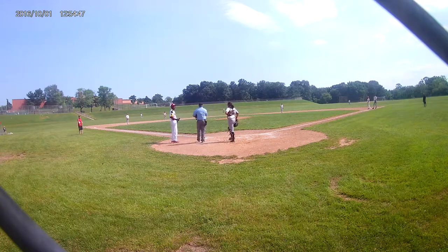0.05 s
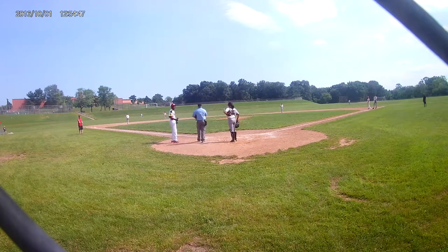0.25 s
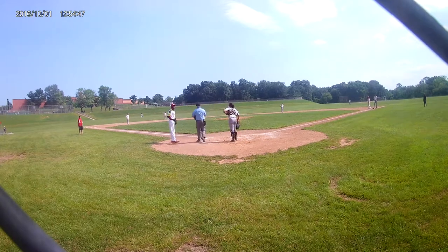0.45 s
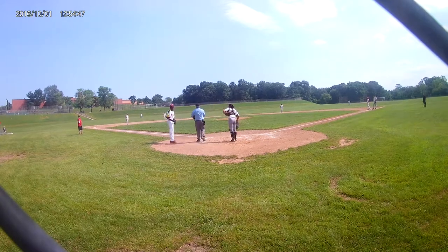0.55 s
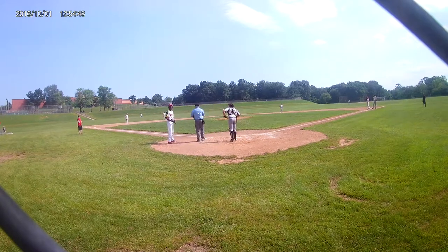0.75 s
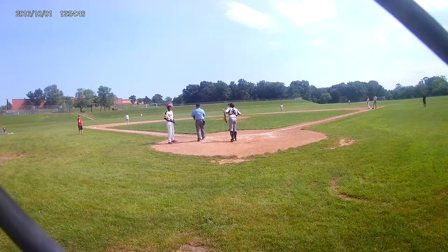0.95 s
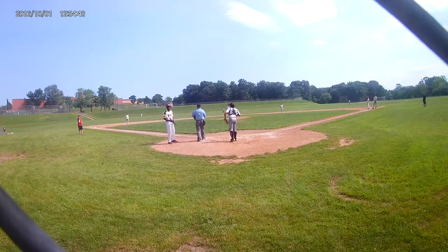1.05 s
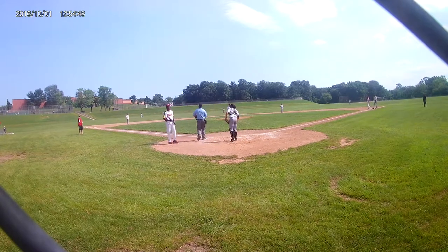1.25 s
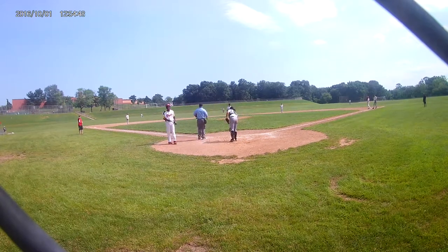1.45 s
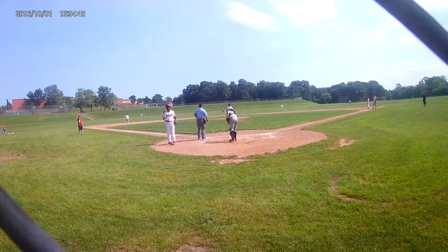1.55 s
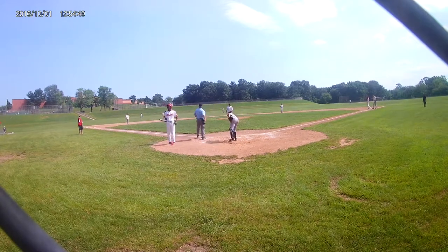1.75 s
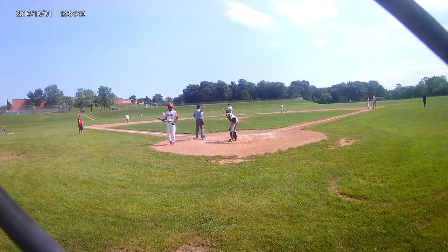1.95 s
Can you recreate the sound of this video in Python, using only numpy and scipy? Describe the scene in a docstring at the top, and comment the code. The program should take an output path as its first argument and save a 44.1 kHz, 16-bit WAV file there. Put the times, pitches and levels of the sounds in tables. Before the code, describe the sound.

Loud overloaded crash of a ball on a metal fence, followed by jangling, booming and ticking links

```python
"""Beside a field, a ball slams into a chain-link fence that carries a small camera.
The blow rings the wires, thuds and crashes, and overloads the microphone. The mesh keeps shaking: thousands of
random wire knocks, filtered into low, middle and high parts, with hiss as sizzle on top. The frame booms in
uneven swells of low filtered noise, loose links tick as short noise bursts, and a faint rumble lies underneath."""
import sys
import numpy as np
from scipy import signal
from scipy.fft import rfft, irfft, next_fast_len
from scipy.io import wavfile
from scipy.ndimage import uniform_filter1d, map_coordinates

SR = 44100
rng = np.random.default_rng(int(sys.argv[2]) if len(sys.argv) > 2 else 0)


def unload_audio(sound):
    """Save the sound as a 16-bit wav file, at the path given as the first command line argument."""
    columns = np.transpose(np.atleast_2d(sound))
    # keep every value between -1 and 1, then stretch to whole-number steps
    steps = np.round(np.clip(columns, -1, 1) * 32767)
    wavfile.write(sys.argv[1], SR, steps.astype(np.int16))


N = 88200
T = np.arange(N) / SR  # time of every sample, s
HIT_S, RISE_S = 0.2155, 0.0105  # first touch; time the ball takes to load the mesh


def amp(db):
    """Turn decibels into a plain multiplier."""
    return 10 ** (np.asarray(db) / 20)


def unit(x):
    """Scale a signal to an average (rms) level of 1."""
    return x / np.sqrt(np.mean(x ** 2) + 1e-20)


def curve(rows):
    """Join (start_s, level_db) points with straight lines, one value per sample."""
    return np.interp(T, *np.transpose(rows))


def coloured(x, points):
    """Filter x to the given (pitch_hz, level_db) shape without sounding early, then bring it to rms 1."""
    size = 8192
    hz, db = np.transpose(points)
    bins_hz = np.fft.rfftfreq(size, 1 / SR)
    gain_db = np.interp(np.log(bins_hz + 1), np.log(hz + 1), db, -90, -90)
    # Folding the cepstrum makes the filter minimum phase: it only answers after its input.
    cepstrum = irfft(np.log(amp(gain_db)), size)
    cepstrum[1:size // 2] *= 2
    cepstrum[size // 2 + 1:] = 0
    response = irfft(np.exp(rfft(cepstrum)), size)
    return unit(signal.fftconvolve(x, response)[:N])


def ring(hz, t60, t, attack_s=0.0002):
    """A sine that starts at t = 0 and dies away by 60 dB in t60 seconds."""
    t = np.maximum(t, 0)
    attack = 1 - np.exp(-t / attack_s)
    return attack * amp(-60 * t / t60) * np.sin(2 * np.pi * hz * t)


def onset():
    """Silence, then a swift rise while the ball loads the mesh."""
    return np.clip((T - HIT_S) / RISE_S, 0, 1) ** 3.5


# Tone of the field rumble: pitch_hz, level_db (per Hz, relative)
FIELD_TONE = [(15, -46), (25, -15), (81, 10.5), (450, -3.5), (4500, -19.5), (7890, -23.5), (9770, -22.5),
              (15000, -22.5)]
FIELD_DB = -62


def field():
    """Faint outdoor rumble: steady noise, strongest at low pitches."""
    return amp(FIELD_DB) * coloured(rng.standard_normal(N), FIELD_TONE)


# Swells of the frame's boom: start_s, level_db
BOOM_SWELLS = [(0.232, -46), (0.25, -17), (0.296, -21.5), (0.324, -34), (0.36, -19), (0.438, -29),
               (0.458, -15), (0.506, -27), (0.552, -14.5), (0.586, -23.5), (0.654, -16), (0.734, -33),
               (0.754, -22), (0.836, -28.5), (0.872, -36), (0.98, -22.5), (1.112, -36), (1.138, -28),
               (1.186, -37), (1.216, -29.5), (1.432, -35.5), (1.472, -30.5), (1.798, -42), (1.816, -28.5),
               (1.88, -39.5), (2.0, -40.5)]
# Tone of the boom: pitch_hz, level_db (per Hz, relative)
FRAME_TONE = [(15, -78), (25, -16.5), (43, -11), (60, -6), (75, 7.5), (92, -0.5), (130, -8.5), (170, -38),
              (290, -120)]


def frame():
    """The frame booms: low noise, its own ups and downs partly evened out, follows the swells."""
    wave = signal.hilbert(coloured(rng.standard_normal(N), FRAME_TONE))
    loudness = np.abs(wave)
    steady = wave.real / (loudness + 0.3) ** 0.75
    return onset() * amp(curve(BOOM_SWELLS)) * unit(steady)


# How strongly the mesh shakes: start_s, level_db
SHAKE = [(.226, -8), (.25, -3), (.3, -9.5), (.36, -12), (.43, -16.5), (.5, -20), (.58, -21.5), (.66, -23.5),
         (.73, -26.5), (.85, -28), (1.0, -31), (1.2, -34.5), (1.45, -38), (1.7, -39), (2.0, -43)]


def shaking_db():
    """The shaking of the mesh over time, which the knocks and faint ticks follow."""
    return curve(SHAKE)


# Clear ticks of loose links: start_s, level_db (at the start of the tick)
TICKS = [(0.3657, -37), (0.454, -51), (0.4788, -46), (0.52, -41), (0.5488, -39), (0.6162, -58),
         (0.6432, -41), (0.6702, -38), (0.7813, -49), (0.8067, -48), (0.8352, -55), (0.8706, -58),
         (0.896, -44), (0.927, -59), (0.9529, -60), (0.9814, -47), (1.0243, -53), (1.0365, -47),
         (1.1395, -57), (1.1699, -48), (1.2228, -57), (1.2773, -49), (1.3063, -55), (1.3286, -57),
         (1.4707, -63), (1.6344, -61), (1.8658, -70), (1.8954, -62)]
# Tone of a tick: pitch_hz, level_db (per Hz, relative)
LINK_TONE = [(2800, -39), (3500, -10), (4600, -1), (5500, -6), (6300, -16.5), (7500, -31)]
TICK_T60 = 0.014  # s to fall by 60 dB
FAINT_TICKS_PER_S, FAINT_TICK_DB = 82, -32.5  # average number; level relative to the shaking


def links():
    """Loose links click dryly: short bursts of noise, some clear and many faint at random times."""
    faint_db = shaking_db() + FAINT_TICK_DB + rng.normal(0, 4, N)
    is_tick = rng.random(N) < FAINT_TICKS_PER_S / SR
    starts = is_tick * amp(faint_db) * onset()
    for start_s, level_db in TICKS:
        starts[round(start_s * SR)] = amp(level_db)
    decay = amp(-60 * T[:SR // 20] / TICK_T60)
    bursts = signal.fftconvolve(starts, decay)[:N]
    return bursts * coloured(rng.standard_normal(N), LINK_TONE)


KNOCKS_PER_S, KNOCK_SPREAD_DB = 6000, 3  # average number of contacts; how uneven they are
SURGES_PER_S, SURGE_DB = 60, 1  # random points per second of the surge curve; its strength
PATCHY_DB, JINGLE_PATCHY_DB = 1.5, 3  # how far pitches come and go


def knocks(per_s=KNOCKS_PER_S, patchy_db=PATCHY_DB):
    """Random wire contacts of uneven size that surge in level and shift in colour."""
    size = amp(KNOCK_SPREAD_DB * rng.standard_normal(N)) * rng.standard_normal(N)
    surge = map_coordinates(rng.standard_normal(400), [T * SURGES_PER_S])
    is_knock = rng.random(N) < per_s / SR
    hits = size * is_knock * amp(SURGE_DB * surge)
    # Raise and lower small patches of pitch and time at random.
    spectrum = signal.stft(hits, nperseg=1024)[2]
    patches = uniform_filter1d(rng.standard_normal(spectrum.shape), size=2, axis=0)
    patches = uniform_filter1d(patches, size=8, axis=1)
    return signal.istft(spectrum * amp(patchy_db * unit(patches)), nperseg=1024)[1][:N]


# Ringing of mesh and rails, also used by the blow: pitch_hz, level_db (relative), t60_s (after the blow only)
WIRE = [(172.9, -3, 0.21), (332.2, 0, 0.58), (580, -12, .4), (732, 3, 0.37), (974, -4.5, 0.2),
        (1257, -1, .3), (1309, 0, 0.75), (1384, -26, 0.27), (1475, 1, 0.49), (1560, 1, 0.56),
        (1655, 1, 0.21), (1947, -5.5, .5)]
RERING_DB, RERING_T60 = -8, 0.18  # level relative to the shaking; s to fall by 60 dB


def rung_wires(hits):
    """Each knock sets the wires ringing again, briefly."""
    t = T[:SR // 4]
    one_ring = sum(amp(db) * ring(hz, RERING_T60, t) for hz, db, _ in WIRE)
    return amp(shaking_db() + RERING_DB) * unit(signal.fftconvolve(hits, one_ring)[:N])


# Tones of the shaking mesh as heard through the mount: pitch_hz, level_db (per Hz, relative)
PANEL_TONE = [(100, -26), (130, -7.5), (165, -1.5), (200, -10), (260, -8), (330, -4.5), (400, -7),
              (550, -8), (630, -12.5), (720, -6), (850, -10), (980, -5.5), (1100, -7), (1250, -31)]  # lowest part
BODY_TONE = [(1000, -28), (1150, -8), (1320, -1), (1500, 0.5), (1660, -8.5), (1760, -16), (1950, -14),
             (2150, -21), (2400, -21.5), (2800, -31)]  # low part of the wire contacts
JINGLE_TONE = [(1900, -49), (2300, -18), (2650, -5.5), (2850, -13), (3150, -4.5), (3400, 1), (3620, -2),
               (3950, -2.5), (4300, -5), (4780, -8.5), (4900, -60)]  # middle part
SIZZLE_TONE = [(3000, -11), (5100, -3), (6870, -1), (7520, -5), (14100, -4.5), (15000, -12)]  # high part
# Level in dB relative to the shaking at its strongest; dB gained per dB of shaking
PANEL_DB, PANEL_GROWS = -2.5, 0.93
BODY_DB, BODY_GROWS = -1, 1
JINGLE_DB, JINGLE_GROWS = -15, 1.119
SIZZLE_DB, SIZZLE_GROWS = -39, 0.86
PANEL_BUILD_S = 0.024  # the slow panel motion takes time to spread


def mesh():
    """The shaking mesh: harder shaking is louder and changes the balance of its four parts."""
    shake_db = shaking_db()
    top_db = shake_db.max()

    def part(source, tone, level_db, grows):
        """One part of the sound, following the shaking at its own rate."""
        return amp(top_db + level_db + grows * (shake_db - top_db)) * coloured(source, tone)

    hits = knocks()
    body = part(hits, BODY_TONE, BODY_DB, BODY_GROWS)
    panel = part(knocks(), PANEL_TONE, PANEL_DB, PANEL_GROWS)
    panel *= 1 - np.exp(-np.abs(T - HIT_S) / PANEL_BUILD_S)
    jingle = part(knocks(patchy_db=JINGLE_PATCHY_DB), JINGLE_TONE, JINGLE_DB, JINGLE_GROWS)
    sizzle = part(rng.standard_normal(N), SIZZLE_TONE, SIZZLE_DB, SIZZLE_GROWS)
    return onset() * (body + rung_wires(hits) + panel + jingle + sizzle)


# Tone of the bright crash: pitch_hz, level_db (per Hz, relative)
CRASH_TONE = [(2650, -21), (4500, -3), (5730, -15.5), (6370, -18), (15000, -29)]
CRASH_DB, CRASH_T60, CRASH_SLAPS_PER_S = -22.5, 0.22, 2000  # level; s to fall by 60 dB; contacts
THUD_DB, THUD_HZ, THUD_T60 = -3.5, 315, 0.14  # the ball's thud in the panel
RING_DB = -17  # added to every level in WIRE


def blow():
    """The ball rings the wires as dying sines, thuds in the panel and crashes as a burst of knocks."""
    t = T - HIT_S - RISE_S / 2  # counted from halfway through the rise
    rings = sum(amp(RING_DB + db + rng.normal(0, 2)) * ring(hz, t60, t) for hz, db, t60 in WIRE)
    thud = amp(THUD_DB) * ring(THUD_HZ, THUD_T60, t)
    crash_level = amp(CRASH_DB - 60 * np.abs(t) / CRASH_T60)
    crash = crash_level * coloured(knocks(CRASH_SLAPS_PER_S), CRASH_TONE)
    return onset() * (rings + thud + crash)


def scene():
    """Add up all the sources, as one channel."""
    return (field() + frame() + links() + mesh() + blow())[None]


CLIP_HARD = 12  # higher means a sharper corner where the sound flattens
TOP_HZ = 15500  # band limit


def record(dry):
    """The microphone input flattens peaks near full scale; nothing is kept above the band limit."""
    clipped = dry / (1 + np.abs(dry) ** CLIP_HARD) ** (1 / CLIP_HARD)
    size = next_fast_len(N + 4096)
    keep = np.fft.rfftfreq(size, 1 / SR) < TOP_HZ
    return irfft(rfft(clipped, size) * keep, size)[:, :N]


dry = scene()
out = record(dry)
unload_audio(out)
```